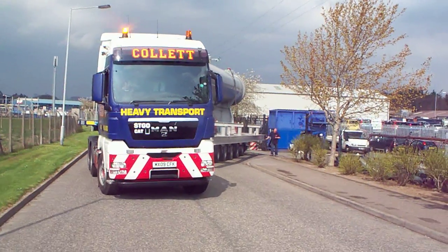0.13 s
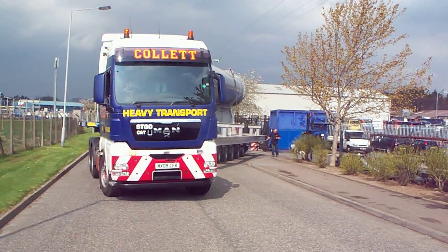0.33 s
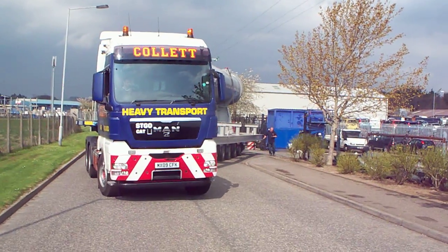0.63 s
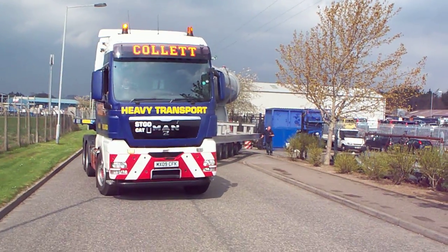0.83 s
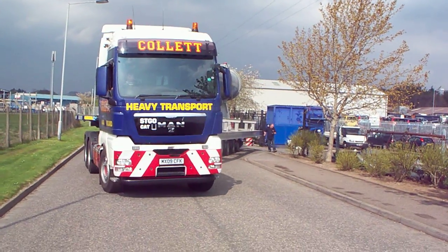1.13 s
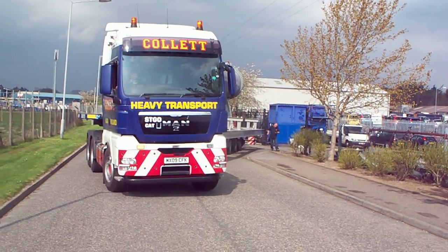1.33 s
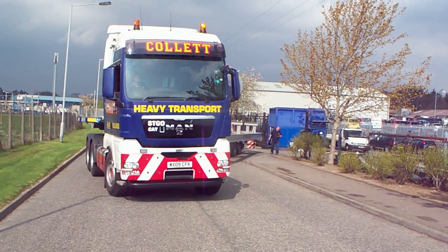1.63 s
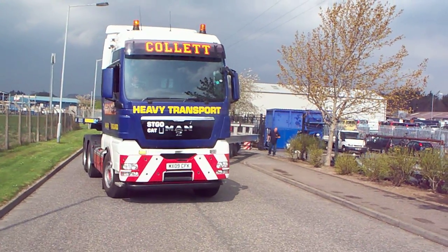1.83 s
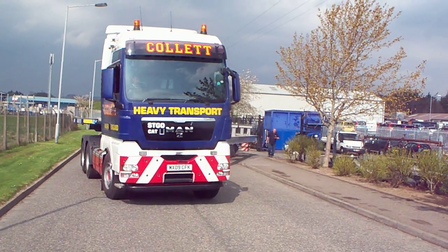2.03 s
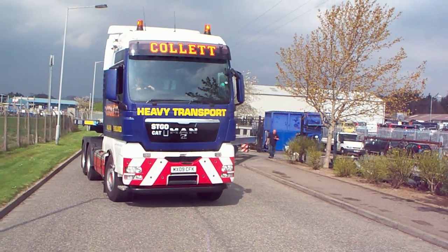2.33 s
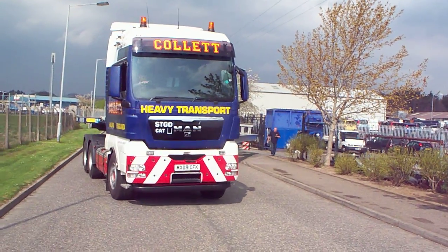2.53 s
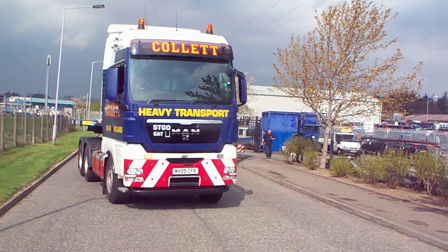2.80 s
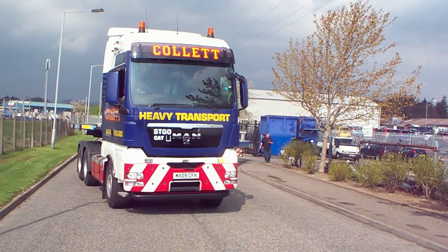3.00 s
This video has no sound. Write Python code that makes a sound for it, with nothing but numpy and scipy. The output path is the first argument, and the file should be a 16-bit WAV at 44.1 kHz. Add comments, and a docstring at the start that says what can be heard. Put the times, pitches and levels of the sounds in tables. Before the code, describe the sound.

Close outdoor mono capture of a slow heavy truck: low fluttering diesel rumble at about thirty pulses a second, engine and fan roar, thin airy hiss with sharper spits mid-way, and low wind gusts on the microphone.

```python
"""On a road, a heavy six-cylinder diesel truck creeps past just above idle, a few metres away.
The exhaust thumps as tones locked to the firing rate, over faint lines from unequal cylinders.
Block and fan roar as noise coloured by panel resonances; thin cab rings are narrow bands of noise.
Air hiss and a whistling band spit a little at each firing, and much louder at some firings.
Wind buffets the microphone as lumpy low noise; a faint mirror image tops the treble."""
import sys
import numpy as np
from scipy import signal
from scipy.fft import rfft, irfft, next_fast_len
from scipy.io import wavfile
from scipy.ndimage import uniform_filter1d, map_coordinates

SR = 44100
rng = np.random.default_rng(int(sys.argv[2]) if len(sys.argv) > 2 else 0)


def ratio(d):
    """dB to gain"""
    e = np.asarray(d, float) / 20
    return 10 ** e


def to_wav(sig):
    """Store sig (one row per channel, or 1-D mono) as 16-bit WAV at the path in sys.argv[1].

    Samples outside -1..1 are clipped; the rate is SR.
    """
    pcm = np.clip(np.atleast_2d(sig), -1, 1) * 32767
    pcm = np.round(pcm).astype(np.int16)
    wavfile.write(sys.argv[1], SR, pcm.T)  # frames by channels


N = 139356
T = np.arange(N) / SR


def unit(x):
    """Scale to rms 1."""
    return x / np.sqrt(np.mean(x ** 2) + 1e-20)


def curves(rows):
    """One value per sample for each column after the time."""
    s, *cols = np.transpose(rows)
    return [np.interp(T, s, c) for c in cols]


def wobble(rate):
    """A smooth random curve, rate knots a second."""
    return map_coordinates(rng.standard_normal(200), [T * rate])


def filtered(x, gain, room=8192):
    """Apply a gain over frequency, with room in samples for the filter to ring out."""
    m = next_fast_len(N + room)
    return irfft(rfft(x, m) * gain(np.fft.rfftfreq(m, 1 / SR)), m)[..., :N]


def noise(gain, patchy_db=0):
    """Noise of rms 1 with random patches in time and pitch, shaped by a gain over frequency."""
    z = signal.stft(rng.standard_normal(N + 512), nperseg=512)[2]
    field = uniform_filter1d(rng.standard_normal(z.shape), size=6, axis=0)
    field = uniform_filter1d(field, size=8, axis=1)
    x = signal.istft(z * ratio(patchy_db * unit(field)), nperseg=512)[1][:N]
    return unit(filtered(x, gain))


def colour(points):
    """Gain from (Hz, dB) points on a log axis."""
    f, level_db = np.transpose(points)
    return lambda hz: ratio(np.interp(np.log(hz + 1), np.log(f + 1), level_db))


def resonance(centre_hz, width_hz):
    """A bell over frequency, 1 at its centre and one half at the edges of its width."""
    return lambda hz: 1 / (1 + (2 * (hz - centre_hz) / width_hz) ** 2)


# Engine speed. Each row: time in seconds, firings per second.
FIRING_RATE = [(0.0, 30.05), (0.316, 29.41), (0.632, 29.05), (0.948, 29.0), (1.264, 29.21), (1.58, 29.57),
               (1.896, 29.98), (2.212, 30.39), (2.528, 30.81), (2.844, 31.39), (3.16, 32.44)]
FIRST_FIRING = .955  # share of a firing interval before the first exhaust pulse


def firings():
    """Running count of exhaust pulses: the firing rate summed over time."""
    return np.cumsum(curves(FIRING_RATE)[0]) / SR - FIRST_FIRING


# Pitches of the exhaust and shaft tones. Each entry: multiple of the firing rate.
TONE_MULTIPLES = [1, 2, 2.5, 3, 11 / 3, 4, 4.4, 5, 6, 7, 8, 11, 17, 18]
# Loudness of those tones, in the same order. Each row: rms level in dB at the start, and at the end.
TONE_LEVELS = [(-23.5, -24), (-38, -41.5), (-46, -48), (-40, -43), (-47, -48), (-37, -45), (-43, -42),
               (-54, -44), (-45, -54), (-40.5, -52), (-46, -54), (-49, -56), (-58, -49), (-50, -57)]
THUMP_WAVER_DB, TONE_WAVER_DB = .7, 1.2
TONE_DRIFT = .012  # cycles, times the root of the multiple
UPPER_FROM, UPPER_LEAD = 4.3, .35  # tones above this multiple lead, by this share of an interval


def exhaust(count):
    """Tones locked to the crank; low whole multiples dip together at each pulse, the lowest steadiest."""
    out = np.zeros(N)
    for k, (start_db, end_db) in zip(TONE_MULTIPLES, TONE_LEVELS):
        waver_db = THUMP_WAVER_DB if k == 1 else TONE_WAVER_DB
        level_db = start_db + (end_db - start_db) * T / T[-1] + waver_db * wobble(4.08)
        lead = UPPER_LEAD * max(k - UPPER_FROM, 0)
        drift = TONE_DRIFT * np.sqrt(k) * wobble(3)
        out -= np.sqrt(2) * ratio(level_db) * np.cos(2 * np.pi * (k * count + lead + drift))
    return out


# Unequal cylinders. Each row: multiple of the firing rate, typical peak level of a line in dB.
CYLINDER_LINES = [(.5, -62), (2, -57), (5, -53), (9, -55.5), (20, -59), (35, -65)]
CYLINDER_SCATTER_DB = 3


def cylinder_pattern(spot):
    """One six-firing cycle: lines at sixths of the firing rate, with random levels and phases."""
    k = np.arange(3, 210) / 6
    scatter_db = CYLINDER_SCATTER_DB * rng.standard_normal(len(k))
    level = ratio(np.interp(k, *np.transpose(CYLINDER_LINES)) + scatter_db)
    phase = rng.random((len(k), 1))
    return level @ np.cos(2 * np.pi * (6 * k[:, None] * spot + phase))


def cylinders(count):
    """Unequal cylinders: a pattern repeating every six firings, slowly blending through three forms."""
    spot = np.arange(4096) / 4096  # place within the six-firing cycle
    patterns = [cylinder_pattern(spot) for _ in range(3)]
    turn = np.pi * T / T[-1]
    early = turn < np.pi / 2
    shares = [np.cos(turn) * early, np.sin(turn), np.cos(turn) * ~early]
    return sum(share * np.interp(count / 6, spot, p, period=1) for share, p in zip(shares, patterns))


# Roar of block and fan. Each row: time in seconds, level in dB before the trim.
ROAR_LEVEL = [(0.0, -32.5), (0.13, -32), (2.54, -30), (2.6, -31), (2.67, -30), (3.16, -31)]
# Tilt of the roar. Each row: frequency in Hz, relative density in dB before the panels.
ROAR_TILT = [(25, -33.5), (50, -5.5), (110, -3.5), (160, -7), (290, -10.5), (375, -13), (420, -8),
             (840, -11.5), (1050, -13), (1860, -15), (2140, -16.5), (2600, -23), (3500, -27.5), (3850, -34),
             (4150, -46), (4500, -58), (9000, -120)]
# Panel resonances. Each row: centre in Hz, width in Hz, lift in dB.
PANEL_LIFTS = [(128, 35, 3.4), (211.7, 42, 4.3), (326, 35, 3.3), (521, 75, 2.4), (576, 19, 4.4),
               (780, 46, 3), (845, 67, 4.5), (1200, 39, 3), (1303, 18, 4.3), (2095, 40, 1.1)]
ROAR_TRIM_DB, ROAR_WAVER_DB = 1, .2
DEEP_SWELL, UPPER_SWELL = 0.05, 0.082  # depth with each firing, as a share of the level
BRIGHTER_DB_PER_S = 0.05  # the upper roar grows as the truck nears


def roar(count):
    """Broad noise through panel resonances; its deep and upper parts swell a little with each firing."""
    def body(hz):
        lift_db = sum(db * resonance(centre, width)(hz) for centre, width, db in PANEL_LIFTS)
        return colour(ROAR_TILT)(hz) * ratio(lift_db)

    def swell(depth, late):  # late: share of a firing interval
        return 1 + depth * np.cos(2 * np.pi * (count - late))

    x = noise(body, patchy_db=0.8)
    deep = filtered(x, lambda hz: 1 / (1 + (hz / 1000) ** 4), room=0)
    upper = (x - deep) * ratio(BRIGHTER_DB_PER_S * T)
    level_db = curves(ROAR_LEVEL)[0] + ROAR_TRIM_DB + ROAR_WAVER_DB * wobble(3.5)
    return ratio(level_db) * (deep * swell(DEEP_SWELL, 0.093) + upper * swell(UPPER_SWELL, 0.29))


# Narrow ringing of cab panels. Each row: centre in Hz, width in Hz, rms level in dB.
CAB_RINGS = [(528.4, 18, -46), (773.4, 18, -47), (1673, 11, -56), (2305, 16, -60)]


def rings():
    """Thin fuzzy bands of noise that stay put while the engine speed moves."""
    return sum(ratio(db) * noise(resonance(hz, width)) for hz, width, db in CAB_RINGS)


SPIT_RISE_S = 0.001


def puff(start_s, size, fall_s):
    """Sum of envelopes that rise fast and die away."""
    t = np.arange(SR // 4) / SR
    rise = 1 - np.exp(-t / SPIT_RISE_S)
    shape = np.asarray(size)[:, None] * rise * np.exp(-t / np.asarray(fall_s)[:, None])
    at = np.round(np.asarray(start_s) * SR).astype(int)[:, None] + np.arange(len(t))
    return np.bincount(at.ravel(), shape.ravel(), N + SR)[:N]


SPIT_LEAD = .14  # share of a firing interval ahead of the exhaust pulse
SPIT_FALL_S, SPIT_SCATTER_DB = .016, 4


def small_spits(count):
    """Envelope of the small air spit just ahead of each exhaust pulse, random in size."""
    starts = np.interp(np.arange(0, count[-1]) - SPIT_LEAD, count, T)
    size = ratio(SPIT_SCATTER_DB * rng.standard_normal(len(starts)))
    return puff(starts, size, np.full(len(starts), SPIT_FALL_S))


# Loud spits. Each row: start in seconds, hiss level in dB, whistle level in dB, fall time in seconds;
# both levels are taken before the rise and fall of the envelope.
LOUD_SPITS = [(0.093, -49, -61, 0.022), (0.3026, -46.5, -57, 0.022), (0.572, -47, -58, 0.012),
              (0.611, -69, -47, 0.036), (.7773, -47, -49, 0.029), (0.947, -39.5, -47, 0.063),
              (1.056, -39.5, -63, 0.011), (1.1233, -53, -48, 0.023), (1.1544, -51.5, -48, 0.029),
              (1.362, -33.5, -43, 0.012), (1.4627, -40, -40, 0.017), (1.5614, -44, -46, 0.047),
              (1.665, -34, -58, 0.0099), (1.733, -44, -44.5, 0.035), (2.0294, -60.5, -47, 0.046),
              (2.137, -51.5, -41, 0.014), (2.2003, -44, -67, 0.022), (2.428, -61, -48, 0.016),
              (2.4634, -52.5, -60, .022), (2.619, -60, -41, 0.018), (2.7183, -41.5, -57, 0.055),
              (2.909, -49, -48, 0.013), (3.0044, -49.5, -41, 0.013)]


def loud_spits():
    """Hiss and whistle envelopes of the loud air spits, each pair starting and dying together."""
    start_s, hiss_db, whistle_db, fall_s = np.transpose(LOUD_SPITS)
    return puff(start_s, ratio(hiss_db), fall_s), puff(start_s, ratio(whistle_db), fall_s)


# Steady air leak. Each row: time in seconds, level in dB without the spits.
HISS_LEVEL = [(0.0, -47), (0.78, -48), (1.61, -45.5), (1.76, -47.5), (2.02, -46), (2.22, -45), (2.6, -49),
              (2.89, -46.5), (3.16, -47.5)]
# Tint of leak and small spits. Each row: frequency in Hz, relative density in dB.
LEAK_COLOUR = [(3800, -62), (4150, -30), (4600, -6.5), (5300, -8.5), (5700, -8), (6300, -5), (6750, -1.5),
               (7250, 0), (7700, -4.5), (7950, -13), (8200, -22.5)]
# Tint of the loud spits. Each row: frequency in Hz, relative density in dB.
LOUD_COLOUR = [(4200, -39.5), (5000, -14), (6000, -9.5), (6600, 0), (7300, 2), (7700, -3.5), (7950, -17.5),
               (8200, -22)]
HISS_SPIT_DB = -3  # small spits, relative to the leak


def hiss(count, loud):
    """Turbulent air as high noise: a steady leak with small spits, plus the loud spits."""
    leak_level = ratio(curves(HISS_LEVEL)[0]) * (1 + ratio(HISS_SPIT_DB) * small_spits(count))
    return leak_level * noise(colour(LEAK_COLOUR), patchy_db=1.9) + loud * noise(colour(LOUD_COLOUR))


# Whistling band. Each row: time in seconds, centre in Hz, level in dB without the spits.
WHISTLE_PATH = [(0.0, 4960, -49.5), (0.58, 5100, -53), (1.01, 5160, -46), (1.32, 5170, -52),
                (1.95, 5147, -49), (2.95, 4970, -54.5), (3.04, 4940, -51), (3.16, 4800, -58.5)]
WHISTLE_WIDTH_HZ = 310
WHISTLE_SPIT_DB = 0  # small spits, relative to the steady whistle


def whistle(count, loud):
    """Air whistling in a narrow band: two slow noises carried on a gliding cosine and sine."""
    centre_hz, steady_db = curves(WHISTLE_PATH)
    level = ratio(steady_db) * (1 + ratio(WHISTLE_SPIT_DB) * small_spits(count)) + loud
    band = resonance(0, WHISTLE_WIDTH_HZ)
    turn = 2 * np.pi * np.cumsum(centre_hz) / SR
    return level * (noise(band) * np.cos(turn) + noise(band) * np.sin(turn))


# Gusts on the microphone. Each row: time in seconds, level in dB before the random lumps.
WIND_LEVEL = [(0, -29), (.1, -49.5), (.6, -46), (.75, -38.5), (.92, -25), (1.1, -53.5), (1.35, -36),
              (1.53, -27), (1.75, -36.5), (2.1, -37.5), (2.27, -31), (2.45, -29), (2.6, -30.5),
              (2.75, -28.5), (2.95, -30), (3.16, -29.5)]
# Tint of the wind. Each row: frequency in Hz, relative density in dB.
WIND_TINT = [(2, -24.5), (6, -4.5), (20, 15), (30, -1.5), (50, 9.5), (100, -13), (250, -33.5), (600, -53)]
WIND_LUMPS_DB = 3


def wind():
    """Low buffeting: deep noise whose level follows the gusts with random lumps."""
    return ratio(curves(WIND_LEVEL)[0] + WIND_LUMPS_DB * wobble(7.64)) * noise(colour(WIND_TINT))


def scene():
    """Truck and wind, one channel."""
    count = firings()
    engine = exhaust(count) + cylinders(count) + roar(count) + rings()
    loud_hiss, loud_whistle = loud_spits()
    air = hiss(count, loud_hiss) + whistle(count, loud_whistle)
    return (engine + air + wind())[None]


def roll_off(x):
    """The treble ends steeply here."""
    return signal.sosfilt(signal.butter(12, 9010, fs=SR, output="sos"), x)


# Mirror image of the treble. Each row: frequency in Hz, gain of the image in dB.
MIRROR_GAIN = [(8000, 3), (8300, -9.5), (8600, -18.5), (8900, -31.5), (9200, -56)]
SLOW_RATE_HZ = 16000


def record(dry):
    """Slow sampling: treble below half the slow rate folds up into a faint mirror image above it."""
    half_hz = SLOW_RATE_HZ / 2
    kept = filtered(dry, lambda hz: hz < half_hz)
    folded = 2 * kept * np.cos(2 * np.pi * SLOW_RATE_HZ * T)
    mirror = filtered(folded, lambda hz: colour(MIRROR_GAIN)(hz) * (hz >= half_hz) * (hz < 9500))
    return roll_off(kept + mirror)


dry = scene()
out = record(dry)
to_wav(out)
```